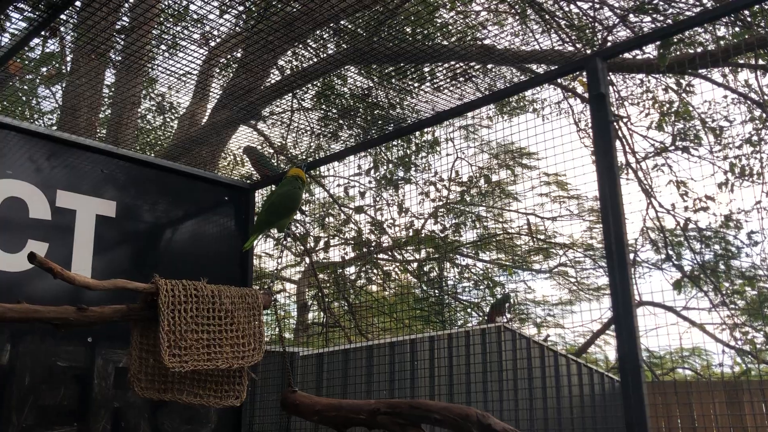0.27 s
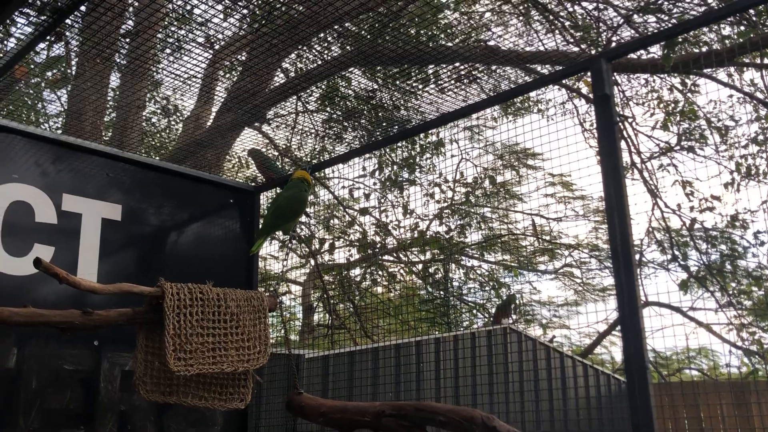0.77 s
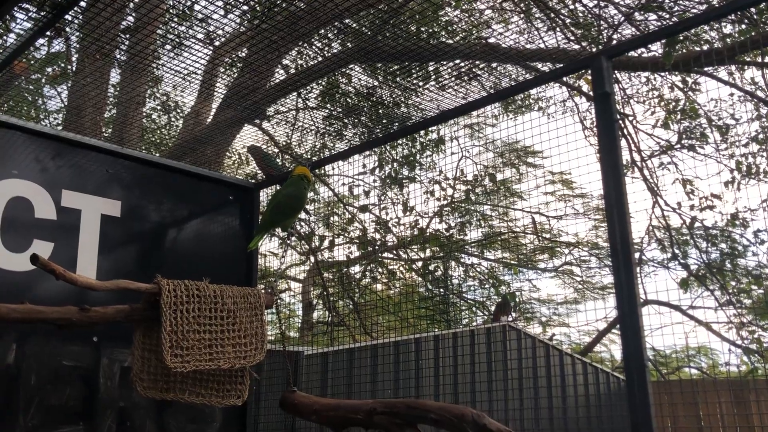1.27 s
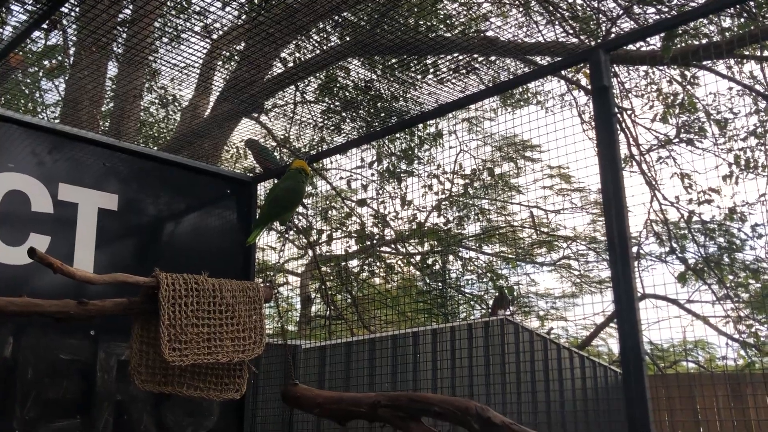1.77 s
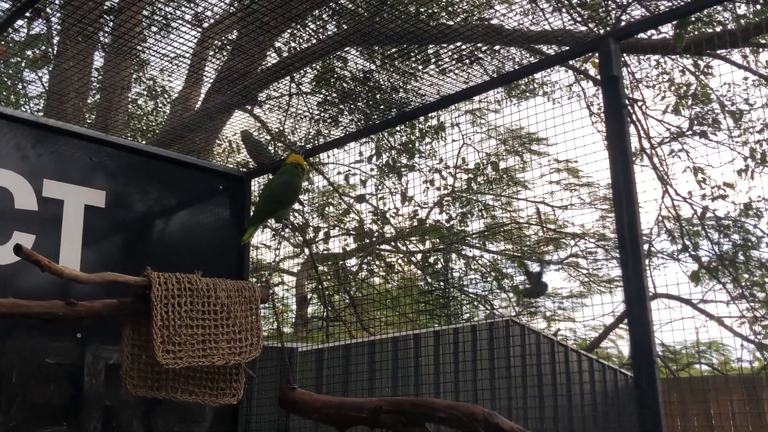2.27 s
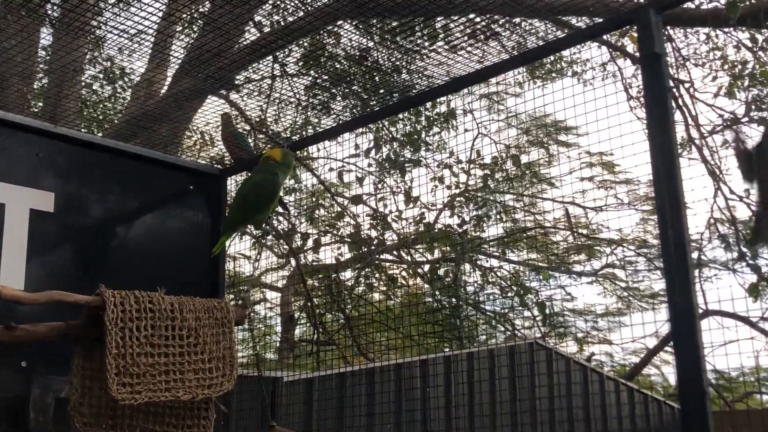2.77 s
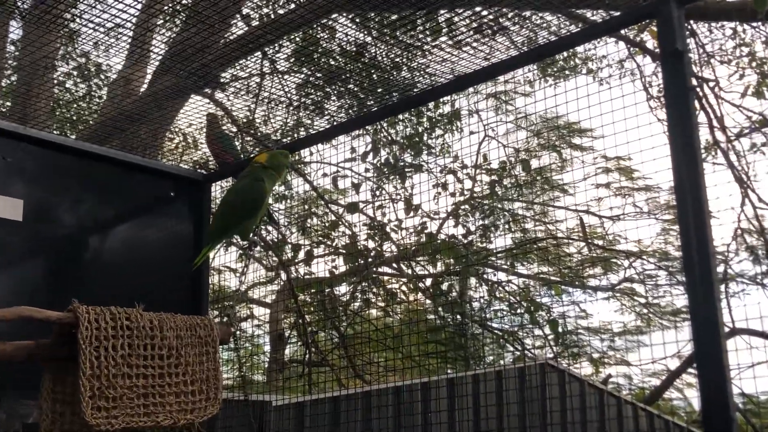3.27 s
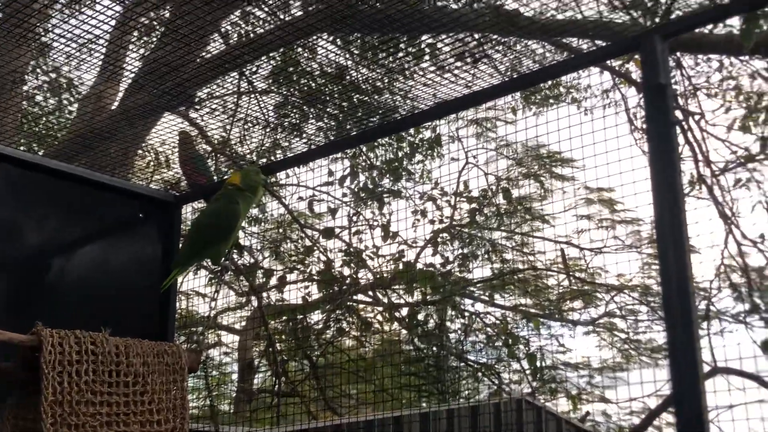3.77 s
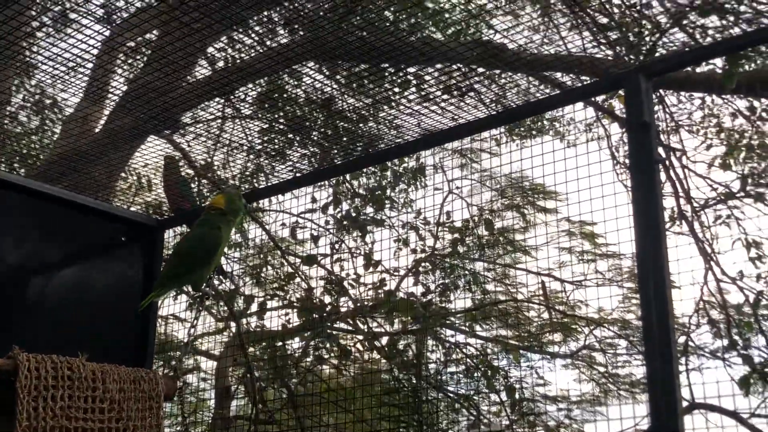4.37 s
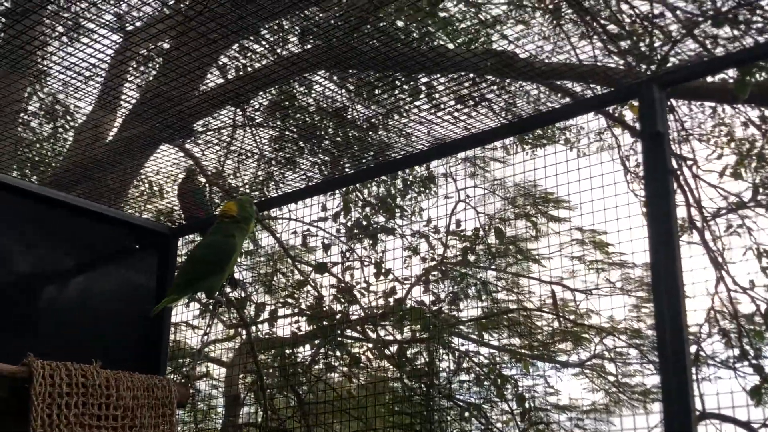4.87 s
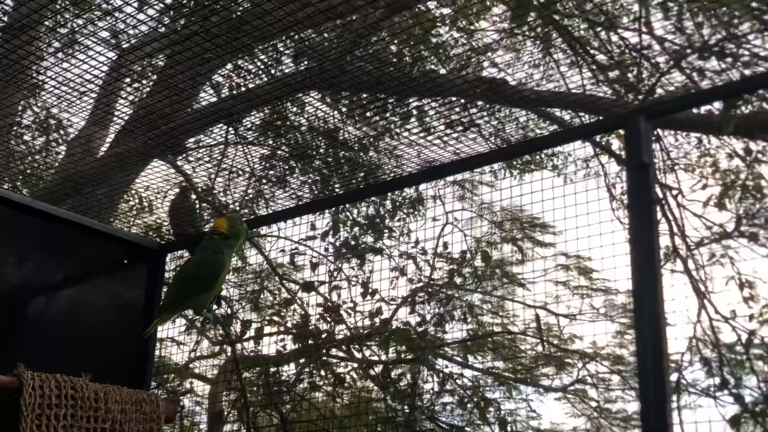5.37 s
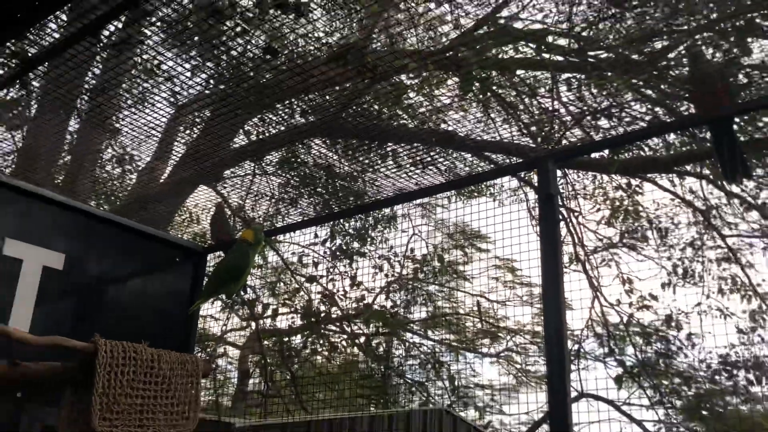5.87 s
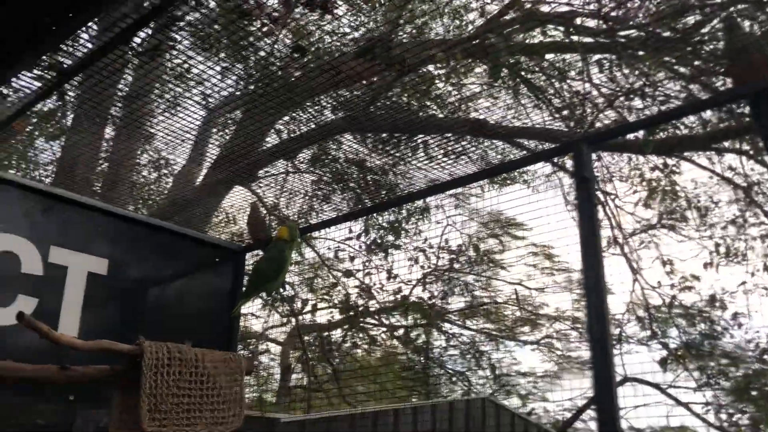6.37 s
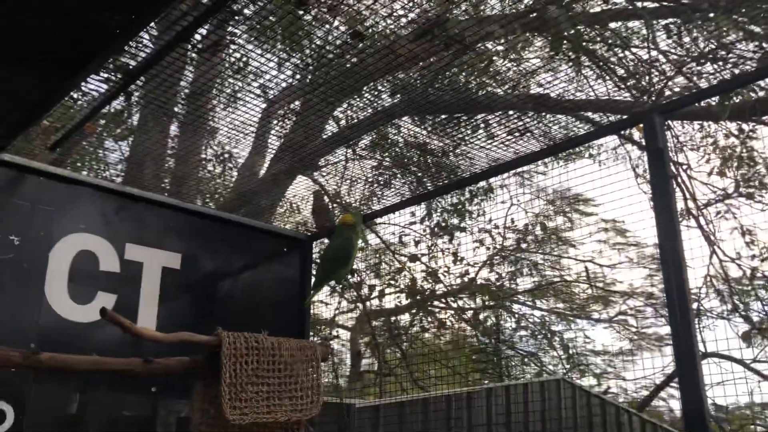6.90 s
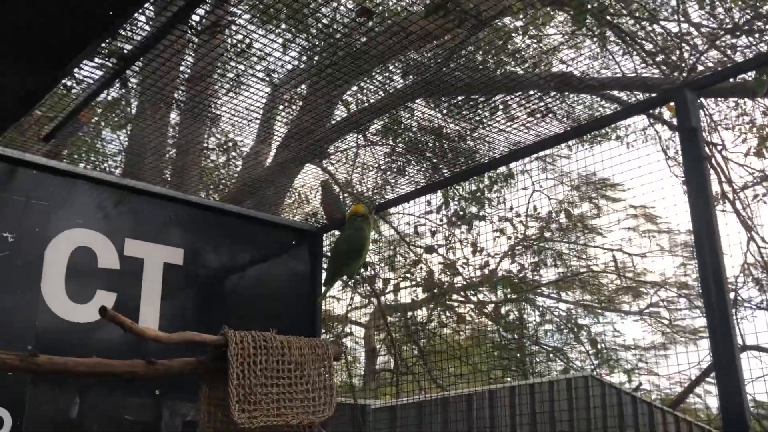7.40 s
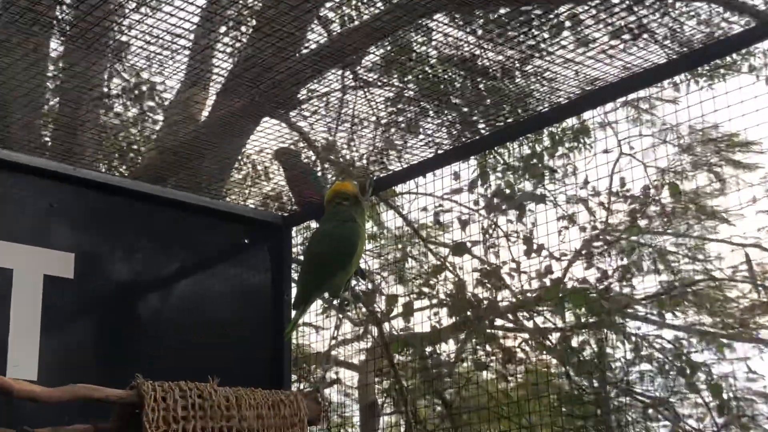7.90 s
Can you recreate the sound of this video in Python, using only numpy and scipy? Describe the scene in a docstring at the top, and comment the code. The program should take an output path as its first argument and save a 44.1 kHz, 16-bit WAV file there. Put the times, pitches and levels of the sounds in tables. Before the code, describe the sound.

A nearby parrot mutters, warbles, then gives loud raspy wails and cracked yodels outdoors, while another bird whistles short rising chirps.

```python
"""A near parrot mutters, yelps and warbles, then twice gives a loud wail and a cracked yodel.
Its syrinx buzzes through throat and beak, turning uneven and noisy when pressed.
Another bird whistles five rising chirps; farther birds whistle, twitter and screech.
Wings and leaves rustle in the wire aviary; sheet walls and trees answer over a low outdoor rumble."""
import sys
import numpy as np
from scipy import signal
from scipy.fft import rfft, irfft, next_fast_len
from scipy.io import wavfile
from scipy.ndimage import uniform_filter1d, map_coordinates

SR = 44100
rng = np.random.default_rng(int(sys.argv[2]) if len(sys.argv) > 2 else 0)


def unload_wav(signal):
    """Save mono or channel-first audio to the path in sys.argv[1] as 16-bit WAV at rate SR, clipped to [-1, 1]."""
    wavfile.write(
        sys.argv[1],
        SR,
        np.round(np.clip(np.atleast_2d(signal).T, -1, 1) * 32767).astype(np.int16),
    )


N = 358974
TOP_HZ = 15830


def parrot():
    """All calls of the near parrot, from one voice."""
    out = np.zeros(N)
    calls = [warble()]
    for kind, rows in [(wail, WAILS), (yodel, YODELS), (yelp, YELPS), (mutter, MUTTERS)]:
        calls += [kind(*row) for row in rows]
    for t, call in calls:
        add(out, t[0], call)
    return amp(-.5) * out


# (start [s], stretch [ratio], pitch [ratio], gain [dB])
WAILS = [(3.93, 1.0, .995, -.5), (5.075, 1.033, 1.018, 0)]
# (age before stretch [s], base pitch [Hz], roughness [0-1])
WAIL_PITCH = [(0, 603.3, 0.2), (.047, 661.8, 0.61), (.098, 714.5, .62), (.146, 824, 0.7), (.25, 779.5, .68),
              (.29, 731.4, 0.8), (.335, 634.4, .55), (.37, 560, 0.5), (.42, 487.6, 0), (.47, 477, .07),
              (.503, 493, 0.1), (.538, 550.3, 0.12), (.568, 560.6, 0.4)]
# (age before stretch [s], tone level [dB], rasp level [dB])
WAIL_FORCE = [(.005, -38, -49.5), (.052, -26, -30.5), (.13, -21, -30), (.205, -30, -17), (.226, -22, -27.5),
              (.32, -22, -20.5), (.48, -17.5, -33), (.555, -21.5, -26), (.57, -29.5, -32)]
# throat and beak response: (frequency [Hz], gain [dB])
BEAK_WIDE = [(300, -67), (490, -7), (750, 0.5), (980, 5.5), (1450, -8), (1750, -7), (2200, 8), (2650, -7),
             (3000, -2), (3450, -13), (4400, -4.5), (5500, -12), (6400, -12), (6850, -18.5), (7400, -14.5),
             (9000, -21.5), (10200, -26.5), (15500, -29.5)]

def wail(start, stretch, pitch_ratio, db):
    """Through a wide beak the voice rises, breaks into a squeal, sinks to a clean low note and lifts."""
    break_s, peak_s, collapse_s = .158, .206, .017
    squeal_hz, squeal_rough, climb_oct_per_s = 2035, .45, 16
    t = times(start, start + stretch * WAIL_PITCH[-1][0])
    age = (t - start) / stretch
    hz, rough = curves(WAIL_PITCH, age)
    past_peak = age - peak_s
    climb_hz = squeal_hz * 2 ** (climb_oct_per_s * past_peak)
    collapse_hz = hz * (squeal_hz / hz) ** np.exp(-(past_peak / collapse_s) ** 2)
    stages = [past_peak > 0, age > break_s]
    hz = pitch_ratio * eased(np.select(stages, [collapse_hz, climb_hz], hz))
    rough = eased(np.select(stages, [rough, squeal_rough], rough))
    tone_db, rasp_db = curves(WAIL_FORCE, age)
    return t, squawk(t, hz, rough, db + tone_db, db + rasp_db, BEAK_WIDE, fundamental_db=-5.5,
                     jitter=.02, scatter_rad=1.58, flutter_db=5.5, hoarse=.27, trim_db=.5, rattle_db=3.5)


# (start [s], gain [dB])
YODELS = [(4.615, 1), (5.795, 0.5)]
# (onset age [s], hold [s], top [Hz], bottom [Hz], roughness [0-1])
YODEL_SWOOPS = [(0, .016, 688.3, 445.4, 0.76), (.084, .009, 980, 449, .4), (0.187, .025, 1015, 642, .75)]
# (age [s], tone level [dB], rasp level [dB])
YODEL_FORCE = [(0, -33.5, -59), (.04, -23.5, -44), (.12, -20, -38), (.195, -17.5, -35.5), (.295, -19, -33),
               (0.318, -32.5, -53)]
# throat and beak response: (frequency [Hz], gain [dB])
BEAK_OPEN = [(300, -49.5), (470, -10.5), (630, -4), (760, -18), (950, 6.5), (1150, 3), (1550, 3.5),
             (1800, -6), (2250, -15.5), (2600, -6.5), (3200, -22.5), (3850, -13.5), (5200, -38),
             (6300, -29), (7200, -17.5), (8100, -26.5), (9000, -20), (10200, -46), (14500, -27.5)]

def yodel(start, db):
    """Three falling swoops, each louder; between them the voice cracks upward by way of a step."""
    fall_oct_per_s, step_hz, step_s, step_rough = 17.5, 792, .027, .7
    t = times(start, start + YODEL_FORCE[-1][0])
    age = t - start
    hz, rough = np.zeros((2, len(t)))
    for onset, hold, top_hz, bottom_hz, swoop_rough in YODEL_SWOOPS:
        fall_oct = fall_oct_per_s * np.maximum(age - onset - hold, 0)
        slide_hz = np.maximum(top_hz * 2 ** -fall_oct, bottom_hz)
        stages = [age >= onset, age >= onset - step_s]
        hz = np.select(stages, [slide_hz, step_hz], hz)
        rough = np.select(stages, [swoop_rough, step_rough], rough)
    tone_db, rasp_db = curves(YODEL_FORCE, age)
    return t, squawk(t, eased(hz), eased(rough), db + tone_db, db + rasp_db, BEAK_OPEN,
                     fundamental_db=-2, jitter=.024, scatter_rad=2.3, flutter_db=4.5, hoarse=.36)


# (start [s], end [s], pitch [Hz], roughness [0-1])
WARBLE_DIPS = [(3.29, 3.341, 408.6, .14), (3.389, 3.408, 475, 0.1), (3.52, 3.599, 467.2, 0.3),
               (3.643, 3.651, 481.7, 0.6), (3.775, 3.782, 440, .6)]
# (time [s], tone level [dB], rasp level [dB])
WARBLE_FORCE = [(3.295, -33, -57.5), (3.45, -14.5, -40), (3.545, -21, -44), (3.635, -21, -45.5),
                (3.764, -17, -40.5), (3.802, -38, -53)]
# throat and beak response: (frequency [Hz], gain [dB])
BEAK_HALF_OPEN = [(300, -42), (470, -15), (680, -24), (830, 4), (950, 7), (1220, -11), (1350, 6),
                  (1440, -5.5), (1750, -25.5), (2800, -21.5), (4000, -23), (4500, -42), (6200, -23),
                  (8800, -28.5), (10000, -52), (11500, -34.5), (15500, -44)]

def warble():
    """The voice slides from a rough upper note into each cleaner dip and springs back."""
    hz, rough, fall_s, rise_s = 664, .7, .023, .014
    t = times(WARBLE_FORCE[0][0], WARBLE_FORCE[-1][0])
    for start, end, dip_hz, dip_rough in WARBLE_DIPS:
        dip = np.clip(1 + np.minimum((t - start) / fall_s, (end - t) / rise_s), 0, 1)
        hz = hz + dip * (dip_hz - hz)
        rough = rough + dip * (dip_rough - rough)
    tone_db, rasp_db = curves(WARBLE_FORCE, t)
    return t, squawk(t, hz, rough, tone_db, rasp_db, BEAK_HALF_OPEN, fundamental_db=4,
                     jitter=.031, scatter_rad=3.3, flutter_db=7.5, hoarse=.29, trim_db=3)


# (start [s], end [s], pitch [Hz], scoop [0-1], sag [0-1], level [dB], roughness [0-1])
MUTTERS = [(2.636, 2.698, 693, .08, 0.03, -37.5, 0.9), (2.69, 2.789, 619.5, 0.46, .06, -36.5, .35),
           (2.812, 2.997, 731.5, 0.06, .22, -33, .1), (3.133, 3.156, 483.7, 0.02, 0.03, -24.5, 0.8),
           (7.9, 7.934, 646, .25, 0.02, -42, 0.4), (8.087, 8.134, 690, .07, 0, -48, 1)]
# throat and beak response, also for yelps: (frequency [Hz], gain [dB])
BEAK_NEARLY_SHUT = [(300, -26), (500, 1.5), (720, 0.5), (1020, 8), (1280, 0.5), (1480, -5), (1800, -13),
                    (2900, -32.5), (4300, -26.5), (5200, -20), (5700, -22.5), (6450, -11), (7500, -36),
                    (11000, -31.5), (15500, -38)]

def mutter(start, end, pitch_hz, scoop, sag, db, rough):
    """A soft note through a nearly shut beak scoops up to pitch, swells and sags."""
    scoop_s, sag_s, swell_db = .022, .07, 4
    t = times(start, end)
    hz = pitch_hz * (1 - scoop * np.exp((start - t) / scoop_s))
    hz *= 1 - sag * np.interp(t, [end - sag_s, end], [0, 1])
    tone_db = db + swell_db * np.linspace(-.5, .5, len(t))
    return t, squawk(t, hz, rough, tone_db, tone_db - 22, BEAK_NEARLY_SHUT, fundamental_db=-2,
                     jitter=.052, scatter_rad=.84, flutter_db=8, hoarse=1, trim_db=-.5)


# (start [s], dive end [s], first pitch [Hz], peak level [dB])
YELPS = [(2.548, 2.595, 1032, -39), (2.998, 3.033, 1413, -26), (3.041, 3.083, 1772, -25),
         (3.088, 3.141, 1978, -21.5), (7.938, 7.992, 1306, -38.5)]

def yelp(start, end, first_hz, db):
    """A rough note swells as it dives, then dies at the bottom of the voice."""
    bottom_hz, rough, release_s = 528, .8, .013
    t = times(start, end + release_s)
    dive = np.interp(t, [start, end], [0, 1])
    hz = first_hz * (bottom_hz / first_hz) ** dive
    tone_db = db + np.interp(dive, [0, .6, 1], [-12, 0, -7.5])
    return t, squawk(t, hz, rough, tone_db, tone_db - 20.5, BEAK_NEARLY_SHUT, fundamental_db=1,
                     jitter=.035, scatter_rad=.99, flutter_db=1.5, hoarse=1, trim_db=1.5)


def squawk(t, hz, rough, tone_db, rasp_db, beak, fundamental_db, jitter, scatter_rad, flutter_db,
           hoarse, trim_db=0, rattle_db=.5):
    """The syrinx buzzes through throat and beak; when pressed, its cycles turn uneven and noisy."""
    highpass_hz, split_hz = 330, 2600
    rough = np.abs(rough)
    phase = phase_of(hz * (1 + jitter * rough * wobble(t, 600)))
    buzz = np.zeros(len(t))
    for k in range(1, 34):
        loose = rough * np.minimum(k / 6, 1.3)  # low harmonics stay firmer
        stray_rad = scatter_rad * loose * wobble(t, 450) + rng.uniform(0, 2 * np.pi)
        level_db = fundamental_db * (k == 1) + flutter_db * np.sqrt(loose) * wobble(t, 110.4)
        buzz += amp(level_db) * np.cos(k * phase + stray_rad) * (k * hz < TOP_HZ)
    # air escapes once a cycle
    puffs = hoarse * rough * (1 + np.cos(phase)) * noise(t, [(500, -12), (2500, 5)])
    source = (2 * buzz * np.sqrt(hz / SR) + puffs) * fade(t, .0036)
    voice = filtered(source, lambda f: amp(along(beak, f)) / np.sqrt(1 + (highpass_hz / (f + 1)) ** 8))
    low = filtered(voice, lambda f: 1 / (1 + (f / split_hz) ** 10))
    gate = voice_breaks(t, hz)
    tones = gate * low * amp(tone_db) / band_level(gate * voice, 350, split_hz)
    rasp = (voice - low) * amp(rasp_db + trim_db) / band_level(voice, 3300, 5400)
    rattle = amp(rattle_db * rough * wobble(t, 280))
    return (tones + rattle * gate ** .3 * rasp) * fade(t, .01)


# catches in the voice: (time [s])
CATCHES_S = [3.451, 3.491, 3.549, 3.706, 3.739, 4.721, 5.902]

def voice_breaks(t, hz, leap_oct_per_s=46, catch_s=.0049):
    """Gain that drops while the syrinx leaps up a register, and at each catch."""
    climb_oct_per_s = np.maximum(np.gradient(np.log2(hz)) * SR, 0)
    held = uniform_filter1d(1 / (1 + (climb_oct_per_s / leap_oct_per_s) ** 4), SR // 300)
    stops = sum(np.exp(-((t - s) / catch_s) ** 2) for s in CATCHES_S)
    return .023 + .57 * held * np.clip(1 - stops, 0, 1)


def eased(x):
    """The syrinx needs about 6 ms to change register."""
    return uniform_filter1d(x, size=260, mode="nearest")


# (start [s], end [s], top pitch [Hz], level [dB], overtone boost [dB])
CHIRPS = [(0.779, 0.95, 3047, -23.5, 8.5), (2.405, 2.58, 2987, -26, 14.5), (3.677, 3.879, 3011, -15.5, 12),
          (6.266, 6.433, 3094, -19, 5), (7.441, 7.593, 3061, -17, 7)]
# (progress [0-1], pitch over top [ratio], gain [dB])
CHIRP_SHAPE = [(0, .895, -27), (.18, .916, -21), (.33, .946, -15), (.5, .982, -6), (.62, .997, -1),
               (.76, 1, 0), (.88, 1, -3), (1, 1, -24)]
# (harmonic [number], gain [dB])
CHIRP_HARMONICS = [(1, 3.5), (2, -18), (3, -31), (4, -41), (5, -36)]

def chirps():
    """A second bird's nearly pure whistle slides up, swells and breaks off."""
    out = np.zeros(N)
    for start, end, top_hz, db, boost_db in CHIRPS:
        t = times(start, end)
        slide, swell_db = curves(CHIRP_SHAPE, (t - start) / (end - start))
        phase = phase_of(top_hz * slide * (1 + .0026 * wobble(t, 300)))
        tone = sum(amp(gain_db + boost_db * (k > 1)) * np.sin(k * phase)
                   for k, gain_db in CHIRP_HARMONICS)
        envelope = amp(db + swell_db + 1.8 * wobble(t, 64)) * fade(t, .004)
        add(out, start, np.sqrt(2) * tone * envelope)
    return out


# (start [s], length [s], first pitch [Hz], glide [oct/s], level [dB])
FAR_WHISTLES = [(.085, 0.21, 3310, 0.05, -59.5), (.135, 0.38, 3150, 0, -70), (.05, 0.17, 5080, 0, -76),
                (0.447, 0.24, 2360, 2, -67.5), (0.626, 0.1, 2060, 0.5, -58.5),
                (1.217, 0.17, 2140, 1, -56.5), (1.04, .18, 4080, 0, -61), (1.405, 0.11, 5060, 0, -55.5),
                (1.875, 0.2, 2360, 4, -65.5), (2.005, 0.15, 5080, 0.3, -70.5),
                (2.072, 0.27, 3407, 0, -62.5), (6.68, 0.076, 3180, 1.5, -63)]
# (start [s], pitch crest [s], end [s], top pitch [Hz], level [dB])
FAR_TWITTERS = [(1, 1.029, 1.09, 4430, -58.5), (7.074, 7.154, 7.195, 2785, -55.5)]
# (start [s], length [s], pitch [Hz], level [dB])
FAR_SCREECHES = [(0.61, 0.33, 4400, -72.5), (1.083, .19, 3430, -56.5), (1.072, 0.66, 2916, -69),
                 (1.278, 0.24, 2660, -55), (1.375, .295, 3560, -62), (7.281, 0.15, 4050, -46),
                 (7.292, 0.18, 2950, -46)]

def far_birds(waver_period_s=.049, waver_oct=.145):
    """Gliding whistles, wavering twitters and hoarse screeches from farther cages."""
    out = np.zeros(N)
    for start, length, first_hz, glide, db in FAR_WHISTLES:
        t = times(start, start + length)
        hz = first_hz * 2 ** (glide * (t - start))
        add(out, start, amp(db) * far_tone(t, hz, rough=.38))
    for start, crest, end, top_hz, db in FAR_TWITTERS:
        t = times(start, end)
        hz = top_hz * 2 ** (-waver_oct * np.sin(np.pi * (t - crest) / waver_period_s) ** 2)
        add(out, start, amp(db) * far_tone(t, hz, rough=.08))
    for start, length, hz, db in FAR_SCREECHES:
        t = times(start, start + length)
        add(out, start, amp(db) * far_tone(t, hz, rough=.88))
    return out


def far_tone(t, hz, rough):
    """One unsteady tone of a distant bird, with weak overtones."""
    phase = phase_of(hz * (1 + .049 * rough * wobble(t, 700)))
    tone = np.sin(phase) + amp(-9) * np.sin(2 * phase) + amp(-21.5) * np.sin(3 * phase)
    return unit(tone * amp(4.2 * wobble(t, 56.3))) * fade(t, .024)


# (start [s], peak [s], end [s], swish level [dB], hiss level [dB])
RUSTLES = [(0.016, 0.06, .24, -54, -58), (0.607, 0.667, .85, -65, -64), (1.382, 1.456, 1.7, -76, -54),
           (2.146, 2.205, 2.28, -58, -54.5), (2.291, 2.315, 2.39, -54.5, -66),
           (6.698, 6.908, 7, -50.5, -51.5), (6.891, 7.041, 7.135, -45, -48), (7.7, 7.809, 7.9, -48, -55.5),
           (7.819, 7.889, 8.1, -43.5, -56)]
# (frequency [Hz], level [dB])
SWISH_SPECTRUM = [(150, -24.5), (400, -9), (1000, -0.5), (1800, -6.5), (3500, -14.5), (7000, -49.5)]
# (frequency [Hz], level [dB])
HISS_SPECTRUM = [(1200, -11), (2800, 2), (5000, 8), (7500, -1.5), (10000, -12), (15500, -4.5)]

def rustle():
    """Wings and leaves swish and hiss in quick uneven strokes."""
    out = np.zeros(N)
    for start, peak, end, swish_db, hiss_db in RUSTLES:
        t = times(start, end)
        strokes = np.interp(t, [start, peak, end], [0, 1, 0]) * amp(2.3 * wobble(t, 55))
        swish = amp(swish_db) * noise(t, SWISH_SPECTRUM)
        hiss = amp(hiss_db) * noise(t, HISS_SPECTRUM)
        add(out, start, strokes * (swish + hiss))
    return out


# (time [s], level [dB])
TAPS = [(1.715, -34)]

def tap(t60_s=.0091):
    """One sharp tap: a fast-dying noise burst."""
    out = np.zeros(N)
    t = times(0, .033)
    for start, db in TAPS:
        burst = noise(t, [(200, -14), (900, 14), (4000, 8), (8000, 2), (15000, -32)])
        add(out, start, amp(db - 60 * t / t60_s) * burst)
    return out


# (delay [s], gain [dB])
WALL_ECHOES = [(.0043, -19), (.0091, -10), (0.0128, -12.5), (0.0203, -15), (.029, -14), (0.043, -29)]

def walls(x):
    """Direct sound plus first echoes from the sheet walls and roof."""
    out = x.copy()
    for delay, db in WALL_ECHOES:
        add(out, delay, amp(db) * x)
    return out


# (frequency [Hz], t60 [s])
AVIARY_DECAY = [(300, 0.28), (1500, 0.39), (3000, 0.45), (7000, 0.34), (14000, 0.32)]

def trees(x):
    """Diffuse answer of cages and trees, longest near 3 kHz."""
    hz, t, spectrum = signal.stft(rng.standard_normal(SR), SR, nperseg=256)
    decay = amp(-60 * t / along(AVIARY_DECAY, hz)[:, None])
    _, tail = signal.istft(spectrum * decay, SR, nperseg=256)
    response = np.pad(unit(tail) / np.sqrt(len(tail)), (SR // 150, 0))
    return signal.fftconvolve(x, response)[:N]


# (time [s], level [dB])
RUMBLE_LEVEL = [(0, -76), (3, -64.5), (4, -63), (5.6, -54.5), (6.2, -59.5), (8.14, -52.5)]
# (frequency [Hz], level [dB])
AIR_SPECTRUM = [(25, -34), (50, -10), (78, 3.5), (110, -3.5), (170, -8.5), (350, -13), (900, -16),
                (2000, -25), (3200, -22), (4200, -27.5), (6500, -32), (8000, -46.5), (15700, -45.5)]

def outdoors():
    """Nearly steady open air with a low rumble that slowly grows."""
    t = np.arange(N) / SR
    rumble_db, = curves(RUMBLE_LEVEL, t)
    rumble = noise(t, [(22, -32.5), (38, -10), (55, -5), (75, -12.5), (160, -16), (500, -51)])
    air = amp(-54.5 + wobble(t, 2)) * noise(t, AIR_SPECTRUM)
    return amp(rumble_db) * rumble + air


def amp(db):
    """Decibels to gain."""
    return 10 ** (np.asarray(db) / 20)


def unit(x):
    """x at rms 1."""
    return x / np.sqrt(np.mean(x ** 2) + 1e-20)


def phase_of(hz):
    """Running phase in radians."""
    return 2 * np.pi * np.cumsum(hz) / SR


def along(points, hz):
    """(Hz, value) points read on a log axis."""
    f, v = np.transpose(points)
    return np.interp(np.log(hz + 1), np.log(f + 1), v)


def curves(rows, t):
    """Each column after the first, read at t."""
    knots, *columns = np.transpose(rows)
    return [np.interp(t, knots, column) for column in columns]


def times(start, end):
    """Sample times in seconds."""
    return start + np.arange(int((end - start) * SR)) / SR


def fade(t, edge_s):
    """Linear fade in and out."""
    return np.clip(np.minimum(t - t[0], t[-1] - t) / edge_s, 0, 1)


def wobble(t, knots_per_s):
    """Smooth random curve."""
    knots = (t - t[0]) * knots_per_s
    return map_coordinates(rng.standard_normal(int(knots[-1]) + 4), [knots])


def filtered(x, gain):
    """Zero-phase filter with response gain(hz)."""
    size = next_fast_len(len(x) + 8192)
    return irfft(rfft(x, size) * gain(np.fft.rfftfreq(size, 1 / SR)), size)[:len(x)]


def noise(t, spectrum):
    """Noise of rms 1, coloured by (Hz, dB) points."""
    return unit(filtered(rng.standard_normal(len(t)), lambda hz: amp(along(spectrum, hz))))


def add(out, start_s, x):
    """Mix x into out."""
    i = max(round(start_s * SR), 0)
    out[i:i + len(x)] += x[:max(len(out) - i, 0)]


def band_level(x, lo_hz, hi_hz):
    """Running 50 ms rms of one band."""
    band = filtered(x, lambda hz: (hz > lo_hz) & (hz < hi_hz))
    return np.sqrt(np.abs(uniform_filter1d(band ** 2, SR // 20)) + 1e-12)


def scene():
    """Near birds are mostly direct; far ones carry more echo."""
    squawks, whistles, far = parrot(), chirps(), far_birds()
    echo = trees(amp(-10.5) * squawks + amp(-13) * whistles + amp(-1) * far)
    return (walls(squawks) + whistles + amp(2) * far + rustle() + tap() + echo + outdoors())[None]


def record(dry):
    """A brief opening silence; nothing above TOP_HZ."""
    silence_s = .037
    started = np.arange(N) / SR > silence_s
    return filtered(dry[0] * started, lambda hz: hz < TOP_HZ)[None]


dry = scene()
out = record(dry)
unload_wav(out)
```